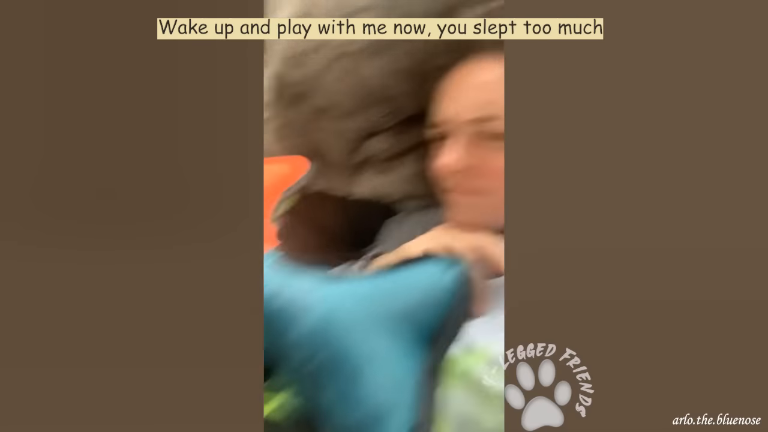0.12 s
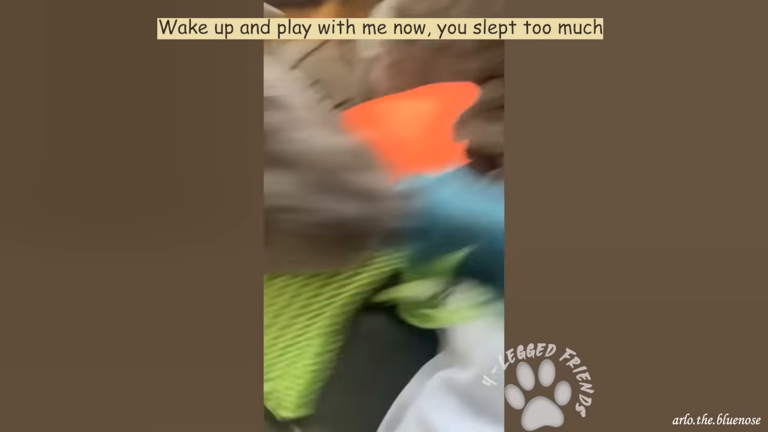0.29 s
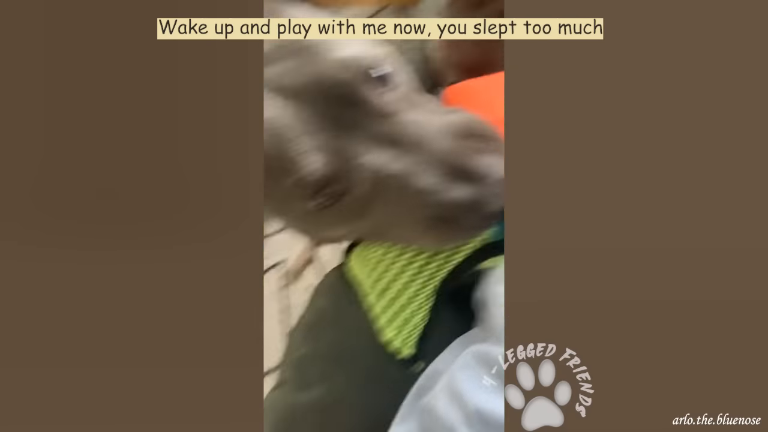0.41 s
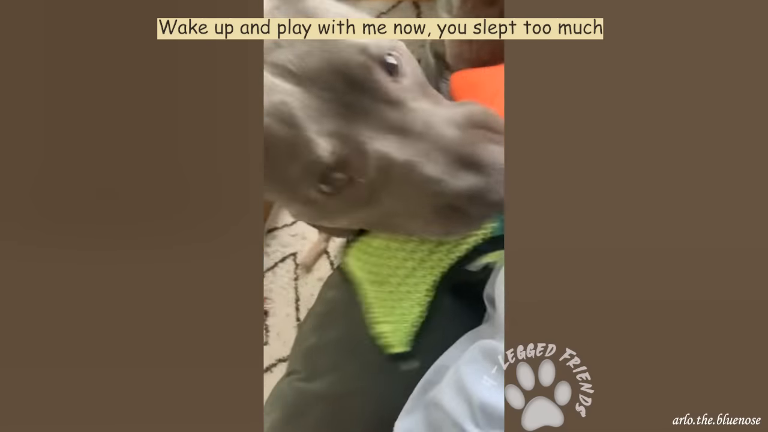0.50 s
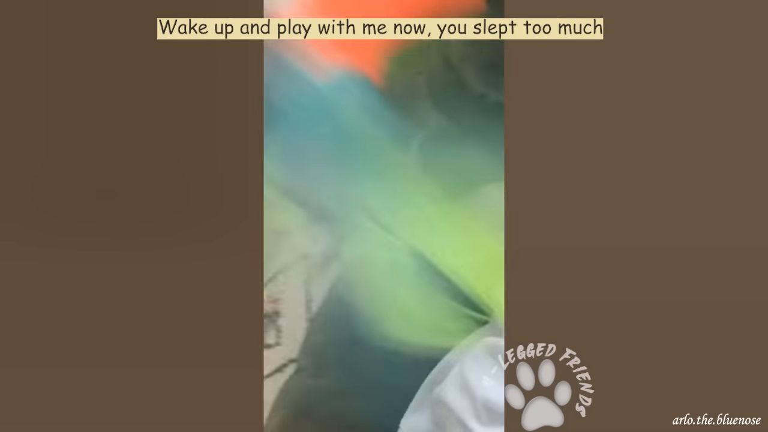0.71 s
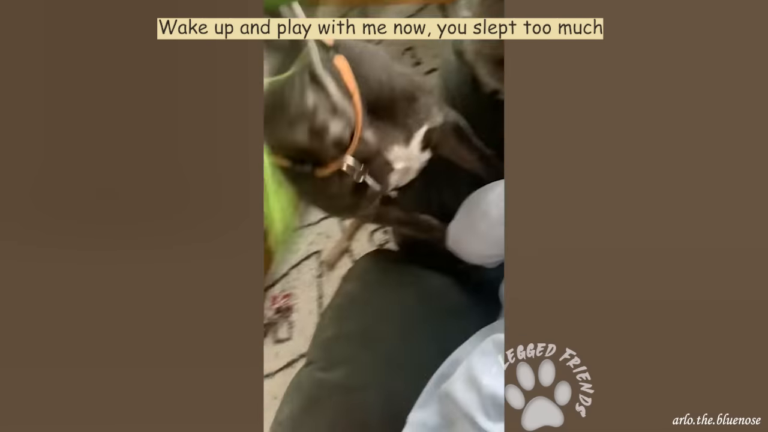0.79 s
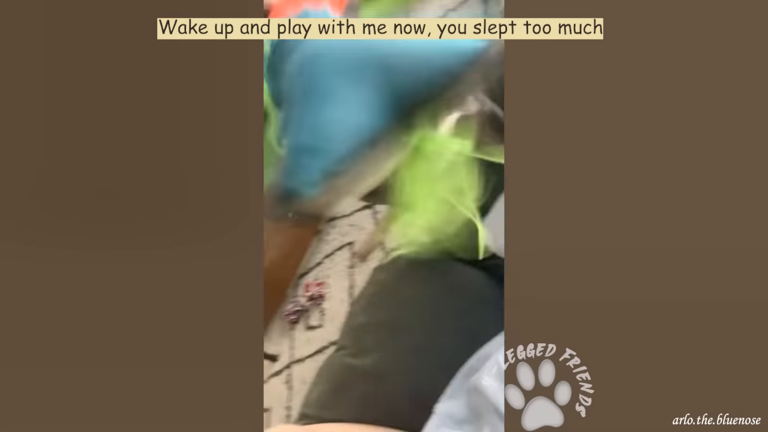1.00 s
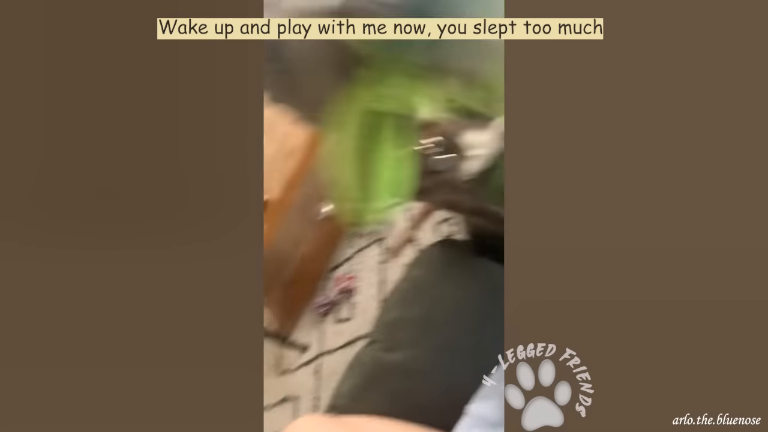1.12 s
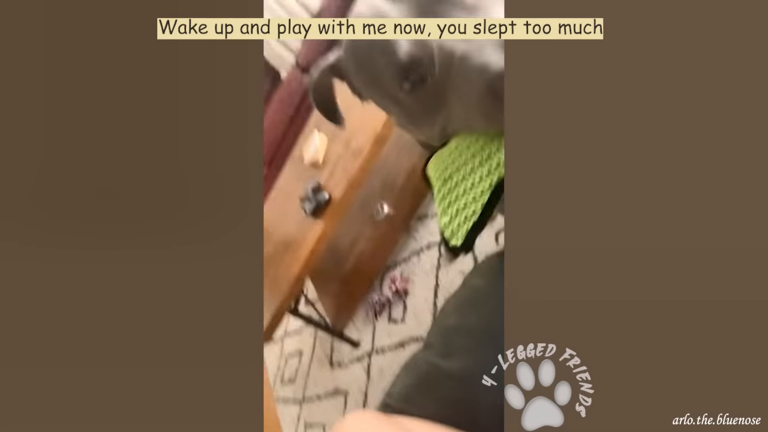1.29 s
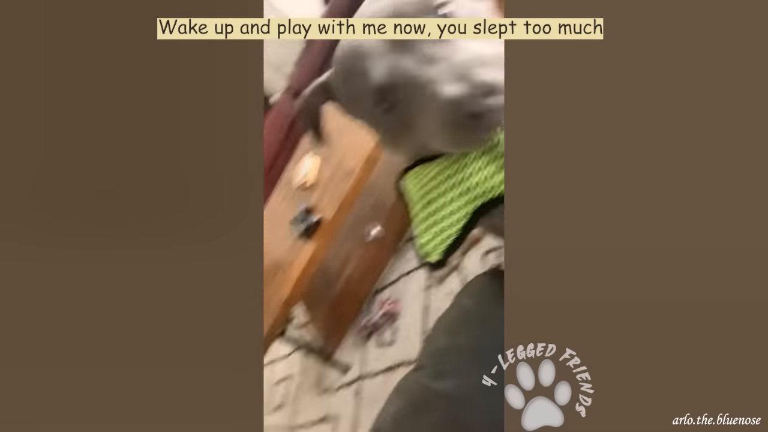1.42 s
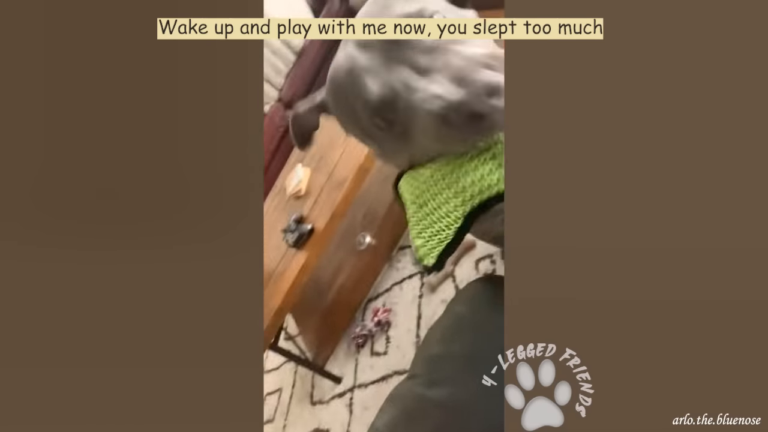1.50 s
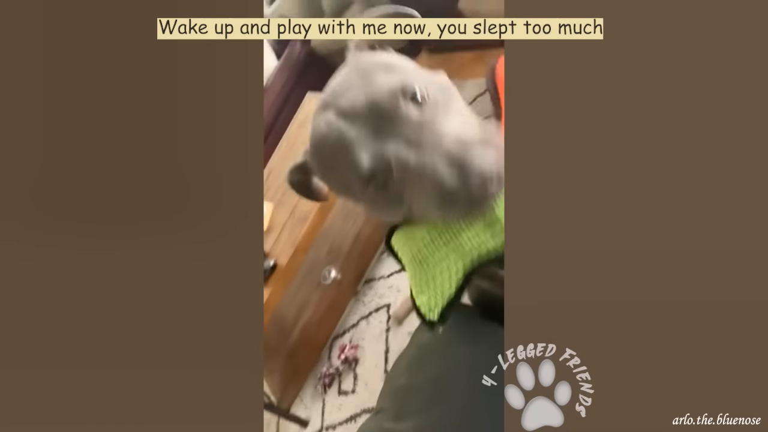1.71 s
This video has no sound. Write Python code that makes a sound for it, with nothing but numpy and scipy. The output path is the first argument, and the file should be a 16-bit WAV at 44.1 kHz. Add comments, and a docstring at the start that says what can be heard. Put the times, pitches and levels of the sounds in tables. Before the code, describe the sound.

Close phone pickup of a dog chewing a squeaky toy in a living room: one shrill, raspy-ending squeak, then three lower, gradually softer chirps and a clipped final one, over quiet room air and faint low hum.

```python
"""A dog bites a squeaky toy indoors, close to a phone. Each bite drives air past a small reed whose pitch
follows the pressure, mostly a quick rise, then a fall. Above 6.5 kHz inharmonic partials sit a fixed distance
over the harmonics, and hiss sounds along. Thin tones and an airy ring sit above the first, highest squeak;
teeth tick, the jaw thumps, hiss patches rasp. The room returns echoes and a tail of sparse taps. Narrow noise
bands hum low under shaped room air."""
import sys
import numpy as np
from scipy import signal
from scipy.fft import rfft, irfft
from scipy.io import wavfile
from scipy.ndimage import uniform_filter1d

SR = 44100
rng = np.random.default_rng(int(sys.argv[2]) if len(sys.argv) > 2 else 0)


def natural_amplitude(level_db):
    """Convert a level in decibels to a linear amplitude factor, elementwise."""
    exponent = np.asarray(level_db, float) / 20
    return 10 ** exponent


def unload_wav(signal):
    """Save mono or channel-first audio to the path in sys.argv[1] as 16-bit WAV at rate SR, clipped to [-1, 1]."""
    wavfile.write(
        sys.argv[1],
        SR,
        np.round(np.clip(np.atleast_2d(signal).T, -1, 1) * 32767).astype(np.int16),
    )


N = 77175  # samples

# squeak path, one table per bite: start_s, pitch_hz, low_level_db, buzz_level_db, hiss_share (0-1 of buzz power)
BITES = [
    [(.2065, 1310, -26.5, -25, 0), (.21, 1386, -19, -23, 0.5), (.2125, 2045, -18.5, -16, 0),
     (.215, 2890, -16.5, -13.5, 0.7), (.2195, 4756, -20.5, -30, 0.7), (.226, 4890, -14, -29, .9),
     (.241, 4885, -13.5, -46, .9), (.263, 4622, -15, -59, .9), (.276, 4799, -15, -55, .9),
     (.284, 4508, -17, -53, .9), (.293, 4372, -18.5, -53, .9), (.301, 4430, -18.5, -47, .9),
     (.306, 4210, -17.5, -43, .9), (.312, 4013, -22.5, -41, 0.8), (.32, 3870, -28, -38, 0.3),
     (.332, 3277, -45, -31, 0.7), (.3355, 1900, -29, -22, 0.5), (.342, 965, -27, -28, 1),
     (.349, 710, -34, -55, 0.5)],
    [(.599, 1148, -43, -45, .4), (.6045, 1129, -19.5, -14.5, 0.2), (.6075, 1344, -19, -22.5, 0),
     (.6105, 1892, -16.5, -15.5, 0.05), (.614, 2044, -18.5, -13.5, 0.27), (.619, 1703, -21.5, -18, 0.9),
     (.624, 1457, -20.5, -21.5, 0.8), (.631, 1105, -27.5, -25.5, 0.9), (.641, 887, -29.5, -27, 0.2),
     (.651, 784, -31.5, -35, 0.7), (.668, 704.5, -38, -42, .6), (.69, 720, -40.5, -40, 0.9),
     (.698, 750, -69, -44, 0.7)],
    [(.9315, 1226, -32, -36.5, .4), (.9365, 1231, -21, -24.5, 0.3), (.94, 1895, -20, -19, 0.23),
     (.9435, 2635, -23, -16, 0.4), (.951, 2423, -18, -20.5, 0.57), (.957, 2186, -19.5, -16, .5),
     (.9595, 1759, -19.5, -21, .5), (.972, 1507, -21, -24.5, 0.3), (.98, 1054, -28, -24.5, 0.2),
     (.99, 897, -29.5, -24.5, .4), (1.0, 1063, -26, -30.5, 0.22), (1.008, 959.4, -29, -26, 0.14),
     (1.024, 742.5, -34.5, -34, .5), (1.034, 713, -38.5, -30.5, 0.3), (1.042, 653, -51.5, -50.5, 0.42)],
    [(1.433, 982, -43.5, -58, 0.2), (1.437, 953, -23, -31.5, .3), (1.443, 1076, -26, -23, 0),
     (1.451, 1177, -23, -21, 0.37), (1.459, 1109, -26, -27, 0.3), (1.466, 973, -25.5, -23, 1),
     (1.477, 834.5, -27.5, -29, 0.4), (1.493, 814, -31, -33, 0.6), (1.503, 752, -32, -32, 0.9),
     (1.515, 696, -58, -41, 0.6)],
    [(1.739, 858, -59, -42, .3), (1.743, 875, -30, -33, 0.35), (1.75, 944, -28.5, -24, 0.6)],
]
# balance of reed partials 1-4: level_db
LOW_PARTIALS_DB = [1.5, -3.5, -4, -5.5]
# the rubber shell dulls partials 2-4: freq_hz, level_db
SHELL = [(2500, 1.5), (3500, -8), (5000, -13.5), (7000, -21.5)]
# tone colour of the upper partials and the hiss: freq_hz, level_db
BUZZ = [(1500, -17.5), (3500, -3), (5000, 0.5), (6000, 2), (7500, 0), (9500, 4.5), (11500, 2), (13000, -2),
        (13500, -8.5), (15800, -13), (16500, -35.5)]
# two thin tones above the first squeak: offset_hz for the lower and the upper
SIDE_OFFSETS_HZ = [5550, 9700]
# their levels: start_s, lower_level_db, upper_level_db
SIDE_LEVELS = [(0.219, -62, -63.5), (0.223, -34, -21), (0.251, -41, -32.5), (0.279, -49, -38),
               (.288, -23, -19.5), (.305, -25, -25), (.315, -29, -62), (.325, -60, -71)]
# airy ring after the first squeak: start_s (negative: counted back from the end), freq_hz, width_hz, level_db
AFTERGLOW = (-1.33, 9698, 1297, -41)
# hiss patches, faint before squeaks, rasping as the first one breaks: start_s, end_s, level_db, low_hz, top_hz
HISS_PATCHES = [(0.182, 0.232, -42, 1440, 13400), (0.302, 0.325, -24, 7280, 8730),
                (0.905, 0.937, -39.5, 6500, 13200), (1.721, 1.738, -49, 6560, 13300)]
# teeth on the toy: start_s, level_db, start_pitch_hz, snap_db (over the blip)
TICKS = [(.4232, -32, 1400, -5), (.5716, -41, 1600, 8), (1.4148, -45, 2000, 17)]
# the jaw's push reaches the microphone softly: start_s, level_db
THUMPS = [(0.211, -37.5), (0.615, -47)]
# reverb time of the tail: freq_hz, t60_s
ROOM_T60 = [(500, 0.44), (1500, 0.53), (4000, 0.54), (8000, 0.52), (14000, 0.43)]
# the room returns less of the whistle: freq_hz, level_db
ROOM_DIP = [(3300, 0), (4600, -3), (5600, 0)]
# ring of an earlier high squeak: freq_hz, width_hz, level_db (at 0 s)
LINGER = [(4897, 203, -50), (4400, 1400, -53.5), (9950, 260, -61), (8000, 1000, -62)]
# spectral shape of the room air: freq_hz, level_db (relative)
AIR = [(12, -32.5), (20, -1), (77, -5.5), (301, -14.5), (422, -16.5), (849, -18), (1290, -23.5),
       (2200, -27), (4940, -32), (12800, -43), (14500, -72)]
# wavering hum: freq_hz, width_hz, level_db
HUM = [(28, 6.5, -54.5), (56.6, 19.3, -49), (71.1, 8.1, -52.5), (465.4, 7.4, -67)]
# treble response of the phone: freq_hz, level_db
PHONE = [(13100, 0.5), (13400, -8), (15900, -5.5), (16400, -62.5)]

SHIMMER_DB = 2.0  # rms level flutter of upper partials and side tones
RING_T60_S = 0.46  # decay of the lingering ring and the afterglow


def evened(x):
    """Scales a sound to rms 1."""
    return x / np.sqrt(np.mean(x ** 2) + 1e-20)


def read(points, hz):
    """Reads a curve of values over log frequency."""
    point_hz, value = np.transpose(points)
    return np.interp(np.log(hz + 1), np.log(point_hz + 1), value)


def coloured(x, points):
    """Filters a sound by a curve of dB over frequency."""
    hz = np.fft.rfftfreq(len(x), 1 / SR)
    return irfft(rfft(x) * natural_amplitude(read(points, hz)), len(x))


def drift(shape, size):
    """Smooth chance of rms 1 along the last axis: noise averaged twice over size samples."""
    once = uniform_filter1d(rng.standard_normal(shape), size)
    return evened(uniform_filter1d(once, size))


def fuzzy(hz, width):
    """A wavering tone: a narrow band of noise, rms 1, as long as the scene."""
    f = np.fft.rfftfreq(N, 1 / SR)
    band = 1 / (1 + (2 * (f - hz) / width) ** 4)
    return evened(irfft(rfft(rng.standard_normal(N)) * band, N))


def struck(t, peak_s):
    """A fast swell that peaks at 1 after peak_s, then dies away."""
    return t / peak_s * np.exp(1 - t / peak_s)


def add(mix, s, sound):
    """Mixes a sound in at s seconds, cut at the end of the scene."""
    part = mix[round(s * SR):][:len(sound)]
    part += sound[:len(part)]


def blend(weights, waves):
    """Sums partials and holds their joint rms near 1 as the weights move."""
    return np.sqrt(2) * (weights * waves).sum(0) / np.sqrt((weights ** 2).sum(0) + 1e-9)


def squeak(rows):
    """Strong low partials, a buzz of harmonics, shifted inharmonic partials above 6.5 kHz, hiss puffed once a cycle."""
    wobble, slip_rad = .003, .25  # rms: share of the pitch, phase slip of partials 5 up
    split_hz, attack_s = 6500, .0015
    s, hz, low_db, buzz_db, share = np.transpose(rows)
    t = np.arange(s[0], s[-1], 1 / SR)
    hz = np.interp(t, s, hz) * (1 + wobble * drift(len(t), size=30))
    turns = np.cumsum(hz) / SR
    k = np.arange(1, 25)[:, None]  # partial numbers
    shape = (len(k), len(t))

    phase = np.pi * rng.random(k.shape) + slip_rad * (k > 4) * drift(shape, size=60)
    flutter = natural_amplitude(SHIMMER_DB * (k > 1) * drift(shape, size=60))
    waves = np.cos(2 * np.pi * k * turns + phase) * flutter
    low_weights = natural_amplitude(np.array(LOW_PARTIALS_DB)[:, None] + (k[:4] > 1) * read(SHELL, k[:4] * hz))
    low = blend(low_weights, waves[:4])

    # harmonics below the split; inharmonic partials, shifted up by a fixed offset, above it
    harmonic_weights = natural_amplitude(read(BUZZ, k * hz)) * (k > 1) * (k * hz < split_hz)
    offset_hz = SIDE_OFFSETS_HZ[0]
    shifted_hz = k * hz + offset_hz
    shifted_weights = natural_amplitude(read(BUZZ, shifted_hz)) * (shifted_hz > split_hz) * 2 / np.sqrt(k)
    shifted = np.cos(2 * np.pi * (k * turns + offset_hz * t) + phase[::-1])
    shifted = shifted * natural_amplitude(SHIMMER_DB * drift(shape, size=60))
    high = blend(np.r_[harmonic_weights, shifted_weights], np.r_[waves, shifted])

    puff_gate = 1 + np.cos(2 * np.pi * turns)
    puffs = evened(coloured(rng.standard_normal(len(t)) * puff_gate, BUZZ))
    share = np.clip(np.interp(t, s, share), 0, 1)
    buzz = np.sqrt(1 - share) * high + np.sqrt(share) * puffs
    voice = natural_amplitude(np.interp(t, s, low_db)) * low + natural_amplitude(np.interp(t, s, buzz_db)) * buzz
    return s[0], np.minimum((t - s[0]) / attack_s, 1) * voice


def side_tones():
    """Thin fluttering sines that follow the first squeak at fixed distances above its pitch."""
    s, *levels = np.transpose(SIDE_LEVELS)
    t = np.arange(s[0], s[-1], 1 / SR)
    bite_s, bite_hz = np.transpose(BITES[0])[:2]
    hz = np.interp(t, bite_s, bite_hz)
    tones = np.zeros(len(t))
    for offset_hz, level_db in zip(SIDE_OFFSETS_HZ, levels):
        level = natural_amplitude(np.interp(t, s, level_db) + SHIMMER_DB * drift(len(t), size=60))
        tones += level * np.sin(2 * np.pi * np.cumsum(hz + offset_hz) / SR)
    return s[0], tones


def afterglow():
    """An airy high ring: a band of noise dying exponentially."""
    s, hz, width, db = AFTERGLOW
    fade = natural_amplitude(db - 60 * np.arange(N) / SR / RING_T60_S)
    return s, fade * fuzzy(hz, width)


def hiss_patch(start, end, db, low_hz, top_hz):
    """A short even hiss of band-limited noise with steep spectral edges."""
    noise = rng.standard_normal(round((end - start) * SR))
    hiss = coloured(noise, [(low_hz, -30), (low_hz, 0), (top_hz, -4), (top_hz, -20)])
    return start, natural_amplitude(db) * evened(hiss) * signal.windows.tukey(len(hiss), .2)


def tick(s, db, start_hz, snap_db):
    """Teeth on the hollow toy: a tiny snap and a blip whose pitch falls exponentially."""
    end_hz, fall_s, ring_s = 650, .003, .0018
    snap_hz, snap_s = 2400, .00013
    t = np.arange(0, .03, 1 / SR)
    glide_hz = end_hz + (start_hz - end_hz) * np.exp(-t / fall_s)
    blip = np.sin(2 * np.pi * np.cumsum(glide_hz) / SR) * struck(t, ring_s)
    snap = np.sin(2 * np.pi * snap_hz * t) * struck(t, snap_s)
    return s, natural_amplitude(db) * (blip + natural_amplitude(snap_db) * snap)


def thump(s, db):
    """The jaw's push: a low sine that swells and dies within a few cycles."""
    pitch_hz, peak_s = 139.3, 0.0029
    t = np.arange(0, .08, 1 / SR)
    return s, natural_amplitude(db) * struck(t, peak_s) * np.sin(2 * np.pi * pitch_hz * t)


def room(x):
    """Near echoes from the sofa, then a tail of sparse taps, each band dying at its own speed."""
    echo_db, echo_t60_s, tail_db = -14, 0.018, -11  # total energies ahead of the whistle dip
    t = np.arange(SR) / SR
    taps = np.zeros(SR)
    at = np.arange(80, SR - 20, 20)
    taps[at + rng.integers(0, 20, len(at))] = rng.choice([-1., 1.], len(at))
    near = taps * natural_amplitude(-60 * t / echo_t60_s)
    hz, frame_s, bands = signal.stft(taps, SR, nperseg=256)
    decay = natural_amplitude(-60 * frame_s / read(ROOM_T60, hz)[:, None])
    tail = signal.istft(bands * decay, SR, nperseg=256)[1][:SR]
    echoes = natural_amplitude(echo_db) * near / np.linalg.norm(near)
    response = echoes + natural_amplitude(tail_db) * tail / np.linalg.norm(tail)
    return signal.fftconvolve(x, coloured(response, ROOM_DIP))[:N]


def background():
    """Room air as shaped noise, hum as narrow noise bands, and the fading ring of an earlier squeak."""
    air = natural_amplitude(-52) * evened(coloured(rng.standard_normal(N), AIR))
    hum = sum(natural_amplitude(db) * fuzzy(hz, width) for hz, width, db in HUM)
    ring = sum(natural_amplitude(db) * fuzzy(hz, width) for hz, width, db in LINGER)
    return air + hum + ring * natural_amplitude(-60 * np.arange(N) / SR / RING_T60_S)


def scene():
    """Squeaks and ticks feed the room; the other close layers stay dry over the background."""
    toy, near = np.zeros(N), np.zeros(N)
    for rows in BITES:
        add(toy, *squeak(rows))
    for row in TICKS:
        add(toy, *tick(*row))
    add(near, *side_tones())
    add(near, *afterglow())
    for row in HISS_PATCHES:
        add(near, *hiss_patch(*row))
    for row in THUMPS:
        add(near, *thump(*row))
    return (toy + room(toy) + near + background())[None]


def band_limit(x):
    """A steep low-pass at the top of the band."""
    return signal.sosfilt(signal.butter(12, 16550, fs=SR, output="sos"), x)


def record(dry):
    """The phone loses the top treble."""
    mix = coloured(dry[0], PHONE)[None]
    return band_limit(mix)


dry = scene()
out = record(dry)
unload_wav(out)
```